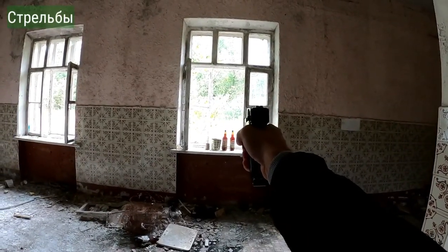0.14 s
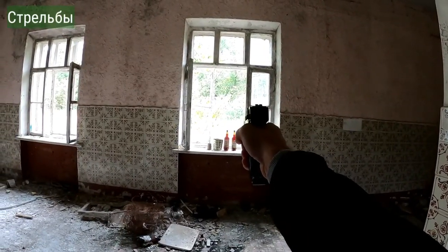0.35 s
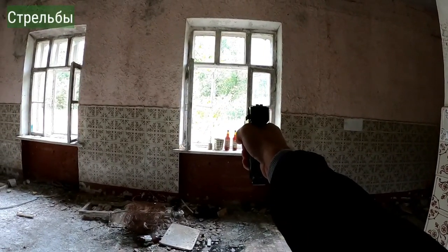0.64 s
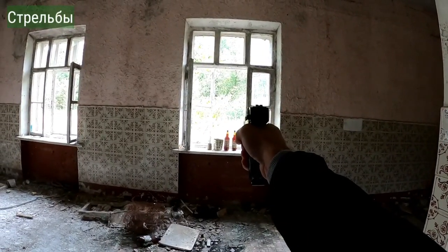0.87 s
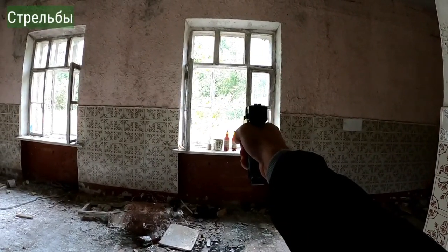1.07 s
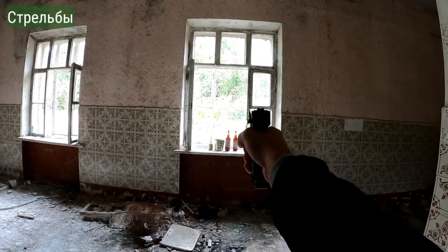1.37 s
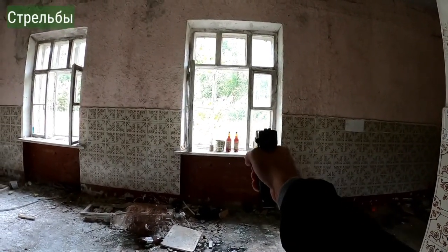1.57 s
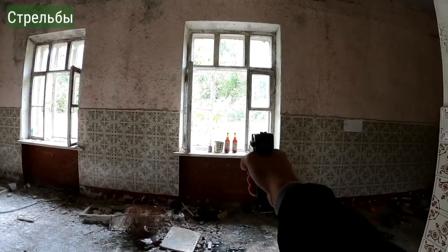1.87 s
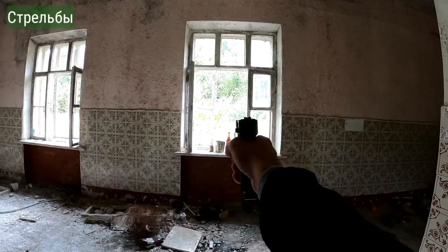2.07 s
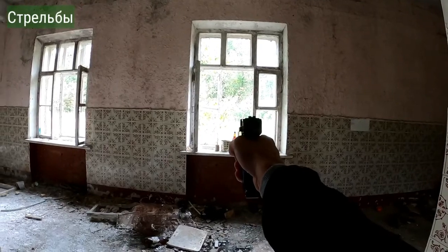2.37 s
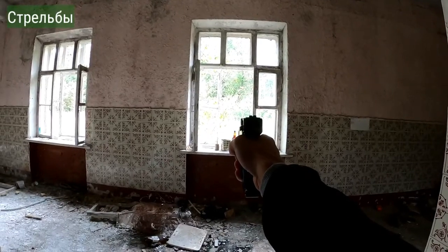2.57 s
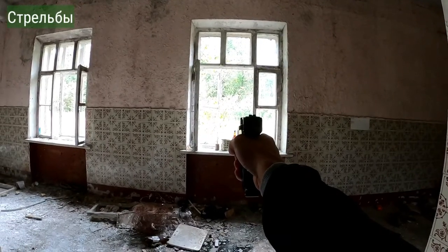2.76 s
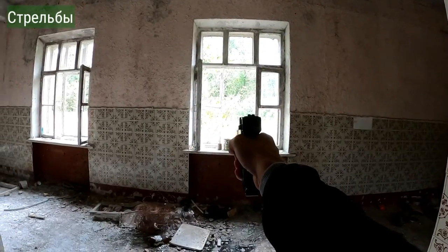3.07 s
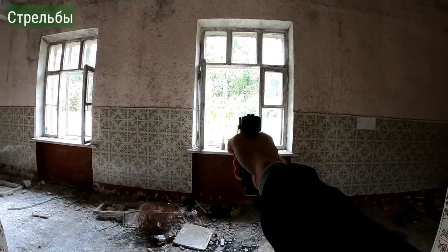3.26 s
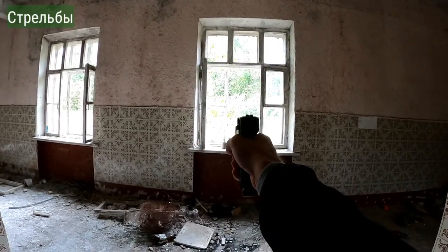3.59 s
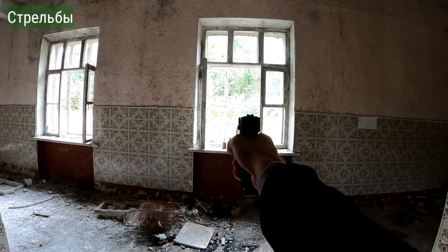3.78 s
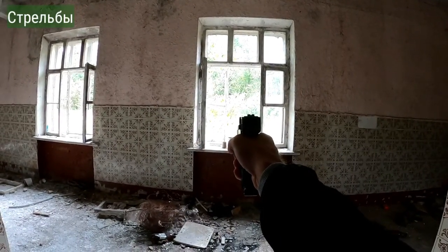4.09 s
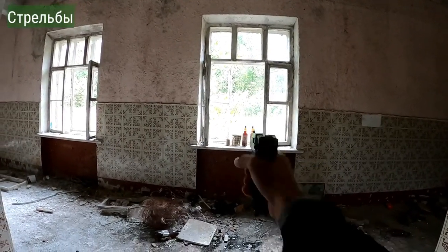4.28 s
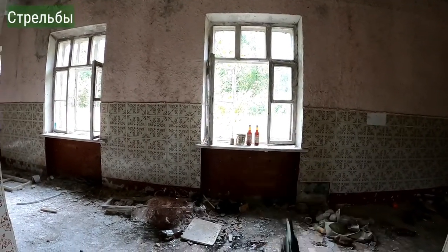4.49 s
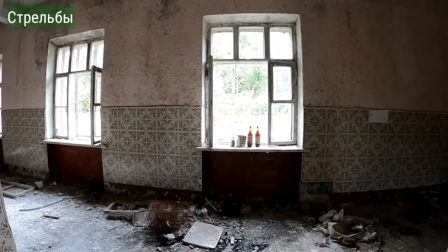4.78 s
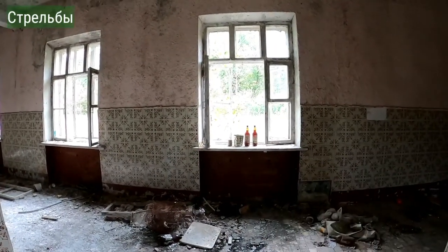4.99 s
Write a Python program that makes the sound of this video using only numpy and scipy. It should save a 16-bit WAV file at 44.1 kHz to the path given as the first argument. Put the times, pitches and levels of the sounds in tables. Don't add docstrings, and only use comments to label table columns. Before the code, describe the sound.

Close stereo pickup beside the shooter in a derelict bare room. Metallic trigger clicks come before each of three pistol cracks with short low thumps. A sleeve rustles very faintly between the first two. Pellets ring a tin can across the room, then lightly strike glass, whose fragments click down. Long, boomy reverberation is ducked by automatic gain and blooms back, over faint outdoor murmur and gusts.

```python
import sys
import numpy as np
from scipy import signal
from scipy.fft import rfft, irfft
from scipy.io import wavfile

SR = 44100
rng = np.random.default_rng(int(sys.argv[2]) if len(sys.argv) > 2 else 0)


def volts_from_decibels(level):
    exponent = np.asarray(level, float) / 20
    return 10 ** exponent


def materialize(psi):
    bounded = np.clip(np.atleast_2d(psi).T, -1, 1)
    quanta = np.round(bounded * 32767).astype(np.int16)
    wavfile.write(sys.argv[1], SR, quanta)


N = 226611
LEAD = SR
FLOOR_MS = 7.8

BLAST_TIMES = [-.33, 1.1126, 2.855, 4.0062]
# (sear click [s], sear level [dB], latch after sear [ms], latch level [dB])
TRIGGER_PULLS = [(0.975, -22, 12.3, -25.5), (2.6967, -20, 8, -25.5), (3.8614, -23, 11, -30.5)]


def fade(s, t60):
    return np.exp(-np.log(1000) * s / t60)


def add(out, s, sound):
    i = int(s * SR) + LEAD
    out[..., i:i + sound.shape[-1]] += sound


def pair(mid, side, like):
    like = np.clip(like, 0, 1)
    shared = np.sqrt(1 + like) * mid
    opposed = np.sqrt(1 - like) * side * np.array([[1], [-1]])
    return (shared + opposed) / np.sqrt(2)


def burst(hz, width, rise_ms, t60_ms, db, like=0.9, snap=0.97):
    s = np.arange(2048) / SR
    envelope = (1 - np.exp(-s * 1000 / rise_ms)) * fade(s, t60_ms / 1000)
    spike = rng.standard_normal((2, 2048)) * envelope
    spike[0, int(rise_ms * SR / 1000)] -= snap
    peak = signal.iirpeak(hz, hz / width, fs=SR)
    mid, side = signal.lfilter(*peak, signal.lfilter(*peak, spike))
    return pair(mid / np.abs(mid).max(), side / np.abs(side).max(), like) * volts_from_decibels(db)


def ring(modes, swell_s=0.00071):
    s = np.arange(SR // 2) / SR
    phases = 2 * np.pi * rng.random(len(modes))
    total = 0
    for (hz, db, t60), phase in zip(modes, phases):
        total = total + volts_from_decibels(db) * np.sin(2 * np.pi * hz * s + phase) * fade(s, t60)
    return (1 - np.exp(-s / swell_s)) * total


def colour(hz, points):
    table = np.array(points)
    return [np.interp(np.log(hz), np.log(table[:, 0]), c) for c in table.T[1:]]


def mechanism_and_blast(near):
    part_ms = [-11, -6.4, -4.5, -1.3, -.1, .4, 7.4, 7.5, 14.3, 20, 23.6]
    # (pitch [Hz], width [Hz], rise [ms], t60 [ms], peak level [dB])
    parts = [(1500, 4000, .6, 22, -24), (5000, 10000, .6, 14, -18), (4000, 7000, 1.5, 30, -16),
             (2000, 2200, .1, 7, -4.5), (4500, 8500, .05, 2, .5), (1850, 1500, .15, 10, -6),
             (4800, 4500, .1, 7, -8.5), (1500, 2500, .2, 4, -15), (2600, 4000, .2, 9, -16),
             (2200, 4000, .6, 20, -19), (2000, 2600, .3, 16, -16)]
    for at in BLAST_TIMES:
        for ms, knock in zip(part_ms, parts):
            add(near, at + ms / 1000, burst(*knock, like=.7, snap=5.5) * volts_from_decibels([[-1], [.5]]))


def hammer(near):
    early_ms, hz, length_ms, level_db = 6.5, 4250, 2.0, -10
    s = np.arange(4096) / SR
    window = np.sqrt(np.sin(np.pi * np.clip(s * 1000 / length_ms, 0, 1)).clip(0))
    note = window * np.sin(2 * np.pi * hz * s)
    for at in BLAST_TIMES:
        add(near, at - early_ms / 1000, volts_from_decibels(level_db + np.array([[-2], [.5]])) * note)


def thump(near):
    # (time after the blast [ms], pitch [Hz], t60 [ms], level [dB], polarity [1 or -1])
    swings = [
        (-13, 105, 60, -29, -1),
        (-1.3, 200, 14, -11.5, 1),
        (1.15, 172, 32, -8.5, -1),
        (0, 45, 70, -21, -1),
    ]
    s = np.arange(4096) / SR
    for at in BLAST_TIMES:
        for ms, hz, t60_ms, db, polarity in swings:
            push = polarity * volts_from_decibels(db) * np.sin(2 * np.pi * hz * s) * fade(s, t60_ms / 1000)
            add(near, at + ms / 1000, push)
            add(near, at + (ms + FLOOR_MS) / 1000, push * volts_from_decibels(-4))


def standing_waves(near):
    # (pitch [Hz], level [dB], t60 [s])
    room_notes = [(110, -30, .45), (132, -24, .4), (190, -30, .4), (245, -26, .5), (270, -28, .5)]
    for at in BLAST_TIMES:
        mid, side = ring(room_notes, swell_s=.012), ring(room_notes, swell_s=.012)
        add(near, at + .014, pair(mid, side, .93))


def blast_to_walls(send):
    # (echo level [dB], brightness [dB per octave])
    shots = [(-0.68, -1.19), (0.32, -1.08), (1, 0.5), (1.6, -0.02)]
    octaves = np.log2(np.fft.rfftfreq(512, 1 / SR) / 1500 + 0.033)
    for at, (db, tilt_db) in zip(BLAST_TIMES, shots):
        pulse = irfft(volts_from_decibels(db + tilt_db * octaves))
        add(send, at - 256 / SR, np.roll(pulse, 256))


def pistol(near, send):
    mechanism_and_blast(near)
    hammer(near)
    thump(near)
    standing_waves(near)
    blast_to_walls(send)


def clicks(near, send, table, wet_db):
    for at, hz, width, rise_ms, t60_ms, db in table:
        click = burst(hz, width, rise_ms, t60_ms, db, snap=0.81)
        frame = burst(1500, 1500, rise_ms, t60_ms, db - 12, snap=1.8)
        add(near, at, click + frame)
        peak = signal.iirpeak(hz, hz / width, fs=SR)
        pulse = signal.lfilter(*peak, signal.unit_impulse(256))
        add(send, at, pulse * volts_from_decibels(db + wet_db))


def trigger(near, send):
    # (time [s], level [dB])
    slack = [(0.9665, -40.5), (1.091, -48.5), (2.668, -61.5), (2.686, -51), (2.82, -51), (2.832, -39.5),
             (3.844, -48)]
    # (pitch [Hz], width [Hz], rise [ms], t60 [ms], level against sear or latch [dB])
    pull_parts = [
        (5500, 8000, .3, 12, 0),
        (5000, 8500, .8, 16, 0),
        (4500, 7000, .8, 11, -1),
    ]
    bounce_ms, echo_db = 2.6, -12.5
    tick = 4800, 6000, .7, 13
    rows = [(at, *tick, db) for at, db in slack]
    for at, sear_db, late_ms, latch_db in TRIGGER_PULLS:
        times = at + np.array([0, late_ms, late_ms + bounce_ms]) / 1000
        for s, db, (*part, rel_db) in zip(times, (sear_db, latch_db, latch_db), pull_parts):
            rows.append((s, *part, db + rel_db))
            rows.append((s + FLOOR_MS / 1000, *part, db + rel_db + echo_db))
    clicks(near, send, rows, wet_db=-17.0)


def slide(near):
    # (pitch [Hz], level [dB], t60 [s])
    slide_notes = [(1040, 0, .014), (1830, -2, .02), (1815, -16, .15), (2780, -4, .012), (4264, -5, .01),
                   (5000, -3, .01)]
    for at, sear_db, late_ms, latch_db in TRIGGER_PULLS:
        add(near, at, ring(slide_notes) * volts_from_decibels(sear_db - 14))
        add(near, at + late_ms / 1000, ring(slide_notes) * volts_from_decibels(latch_db - 14))


def strikes(near, send, hits, modes, hz, wet_db):
    for at, crack_db, ring_db in hits:
        sound = ring(modes) * volts_from_decibels(ring_db)
        add(near, at, burst(hz, 1.6 * hz, .1, 26, crack_db, like=.6, snap=4))
        add(near, at, sound)
        add(send, at, sound * volts_from_decibels(wet_db))


def can(near, send):
    # (time [s], crack level [dB], ring level [dB])
    can_hits = [(2.8927, -6, -25), (2.905, -8.5, -30)]
    # (pitch [Hz], level [dB], t60 [s])
    can_notes = [(330, 0, .1), (440, -2, .1), (1115, 2, .07), (1310, -1, .06), (1620, 1, .05),
                 (1700, 3, .07), (1745, -1, .06), (1975, -1, .05), (2240, 2, .06), (2452, 0, .06)]
    strikes(near, send, can_hits, can_notes, 2000, wet_db=-14.5)


def bottle(near, send):
    # (time [s], crack level [dB], ring level [dB])
    glass_hits = [(4.117, -30, -23), (4.129, -27, -25)]
    # (pitch [Hz], level [dB], t60 [s])
    glass_notes = [(760, -2, .02), (3106, -5, .015), (3854, -2, .025), (7730, -1, .03), (7900, -3, .02),
                   (8650, -9, .012)]
    strikes(near, send, glass_hits, glass_notes, 5400, wet_db=-11.0)


def shards(near, send):
    # (time [s], pitch [Hz], width [Hz], t60 [ms], level [dB])
    landings = [(4.34, 6330, 300, 23, -36.5), (4.378, 6400, 300, 20, -40), (4.642, 5470, 13800, 6.6, -33.5),
                (4.656, 3000, 6000, 31, -28)]
    rise_ms = .7
    rows = [(at, hz, width, rise_ms, t60_ms, db) for at, hz, width, t60_ms, db in landings]
    clicks(near, send, rows, wet_db=4)


def rustle(near):
    # (middle [s], length [s], level [dB])
    movements = [(2.08, 0.17, -80), (2.214, 0.29, -74.5), (2.476, .14, -82.5), (2.6, 0.13, -78)]
    band = signal.butter(2, [3500, 9500], "bandpass", fs=SR, output="sos")
    for at, length, db in movements:
        size = int(length * SR)
        catch_db = 2 * rng.exponential(size=size // 100 + 1).repeat(100)[:size]
        ticks = rng.standard_normal((2, size)) * volts_from_decibels(catch_db)
        soft = signal.sosfilt(band, ticks)
        add(near, at - length / 2, soft * np.hanning(size) * volts_from_decibels(db))


def room():
    # (pitch [Hz], level per Hz [dB], t60 [s], left-right likeness [0-1], left minus right [dB])
    walls = [(30, -4, 1.3, .8, -6.5), (59, -2.5, 1.87, 0.6, 5), (112, 8.5, 1.58, 1, -1),
             (246, 1.5, 1.75, 0.98, -0.5), (440, -7, 1.914, 1, 1.2), (584, -11, 2.27, 0.7, -2.5),
             (760, -8.5, 2.4, 0.9, 3), (1034, -6, 2.14, 0.95, 1), (1997, -3, 1.718, 0.59, 5.5),
             (2400, -7.5, 1.57, 0.9, 2.3), (4620, -7.5, 1.12, 0.91, 2), (6530, -13, 0.81, 0.1, -4),
             (11000, -17.5, 0.52, 0.1, 0), (14000, -26.5, 0.31, .4, -3)]
    build_ms = 10
    size = 3 * SR
    s, f = np.arange(size) / SR, np.fft.rfftfreq(size, 1 / SR)
    noise = rfft(rng.standard_normal((2, size)))
    out = 0
    for hz in 25 * 2 ** (np.arange(29) / 3):
        db, t60, like, pan_db = colour(hz, walls)
        share = np.cos(np.pi / 2 * np.clip(3 * np.log2((f + 1) / hz), -1, 1)) ** 2
        mid, side = irfft(noise * share, size)
        level = volts_from_decibels(db + np.array([[pan_db], [-pan_db]]) / 2)
        out = out + pair(mid, side, like) * level * fade(s, t60)
    out = np.array([np.roll(out[0], 1), out[1]])
    return out * (1 - np.exp(-(s * 1000 / build_ms) ** 2))


def ducked(x):
    # (treble drop [dB], recovery [s], abruptness of the recovery [power],
    # bass drop [dB], settled gain [dB])
    drops = [(7, 0.16, 2.3, 11, -1), (11.5, 0.16, 4.8, 11, -0.5), (14.5, .17, 1.94, 9.5, -.5),
             (17, .13, 2.15, 12, -2)]
    close_s, hold_s, open_s, top_db = 0.0072, 0.45, 0.52, 9.5
    t, gain_db = np.arange(N) / SR, np.zeros((2, N))
    for at, (treble_drop, recovery_s, shape, bass_drop, settled_db) in zip(BLAST_TIMES, drops):
        s = np.maximum(t - at, 0)
        treble_db = settled_db - treble_drop * np.exp(-(s / recovery_s) ** shape)
        opened = 1 - np.exp(-np.maximum(s - hold_s, 0) / open_s)
        bass_db = -bass_drop * (1 - np.exp(-s / close_s)) + (bass_drop + top_db) * opened
        gain_db = np.where(t >= at, [treble_db, bass_db], gain_db)
    bass = signal.sosfiltfilt(signal.butter(2, 358, fs=SR, output="sos"), x)
    return (x - bass) * volts_from_decibels(gain_db[0]) + bass * volts_from_decibels(gain_db[1])


def wind():
    # (peak [s], length [s], level over the calm [dB])
    gusts = [(1.0, 0.48, 2), (1.65, 1.5, 22), (2.495, 0.58, 11.5), (4.65, 1.3, 18)]
    calm_db = -67.5
    t = np.arange(N) / SR
    band = signal.butter(2, [35, 140], "bandpass", fs=SR, output="sos")
    mid, side = signal.sosfilt(band, rng.standard_normal((2, N)))
    gust_db = sum(db * np.cos(np.pi * np.clip((t - at) / length, -.5, .5)) for at, length, db in gusts)
    return pair(mid, side, 1.0) / mid.std() * volts_from_decibels(calm_db + gust_db)


def air():
    # (pitch [Hz], level per Hz [dB])
    murmur = [(15, -34.5), (40, 1), (197, 6), (700, -28.5), (2480, -34.5), (7000, -24.5), (15600, -38.5),
              (22000, -120)]
    f = np.fft.rfftfreq(N, 1 / SR) + 1
    mid, side = irfft(rfft(rng.standard_normal((2, N))) * volts_from_decibels(colour(f, murmur)[0]), N)
    return pair(mid, side, 0.39) / mid.std() * volts_from_decibels(-73)


def scene():
    near, here, sill = np.zeros((2, N + LEAD)), np.zeros(N + LEAD), np.zeros(N + LEAD)
    pistol(near, here)
    trigger(near, here)
    slide(near)
    can(near, sill)
    bottle(near, sill)
    shards(near, sill)
    rustle(near)
    walls = sum(signal.fftconvolve(room(), send[None])[:, LEAD:LEAD + N] for send in (here, sill))
    return near[:, LEAD:] + ducked(walls * volts_from_decibels(-2)) + air() + wind()


def low_pass(x):
    return signal.sosfilt(signal.butter(12, 16660, fs=SR, output="sos"), x)


def record(dry):
    ports = np.array([np.roll(dry[0], 1), dry[1]])
    ports = signal.sosfilt(signal.butter(1, 45, "highpass", fs=SR, output="sos"), ports)
    heard = signal.sosfilt(signal.butter(3, 12000, fs=SR, output="sos"), ports)
    flattened = np.clip(heard, -.9, .9)
    mix = signal.sosfilt(signal.butter(6, 15300, fs=SR, output="sos"), flattened)
    return low_pass(mix)


dry = scene()
out = record(dry)
materialize(out)
```